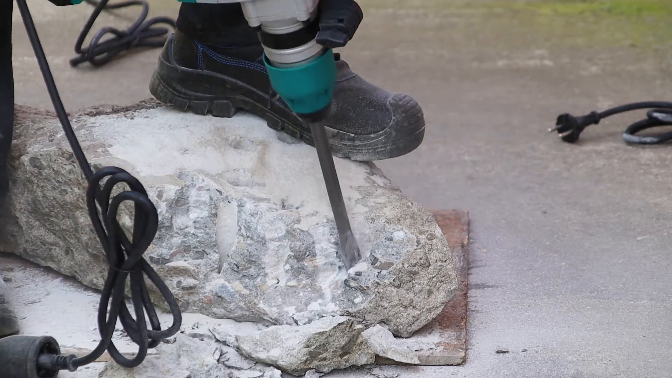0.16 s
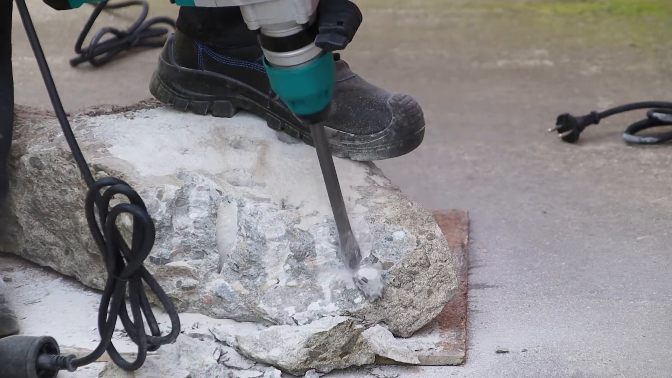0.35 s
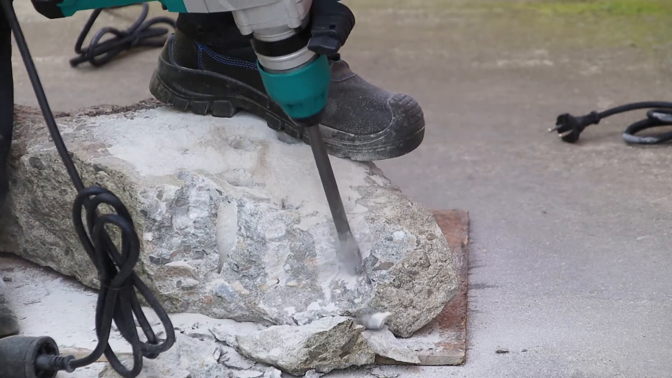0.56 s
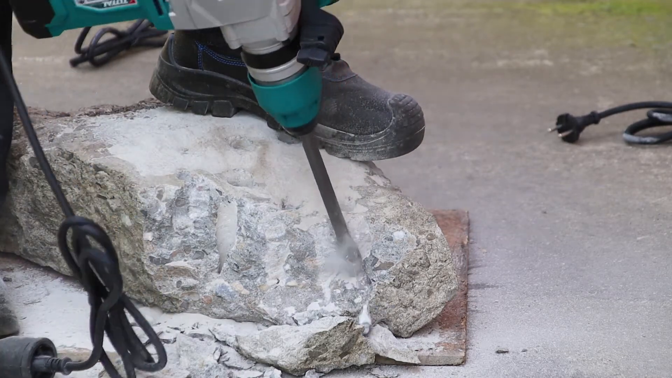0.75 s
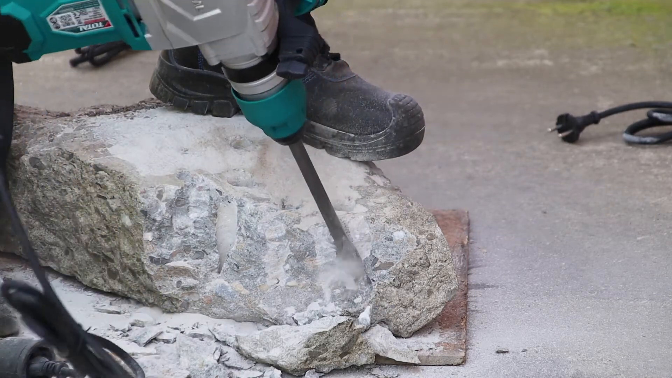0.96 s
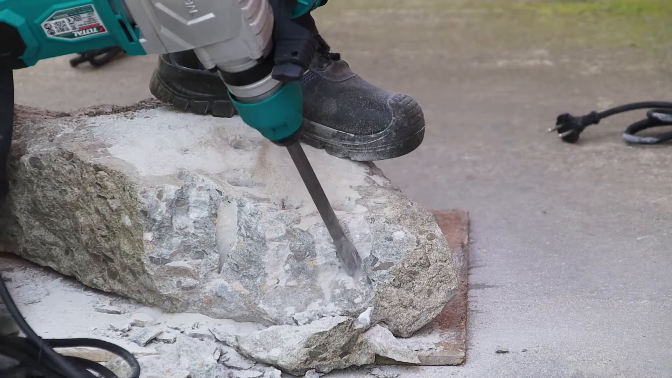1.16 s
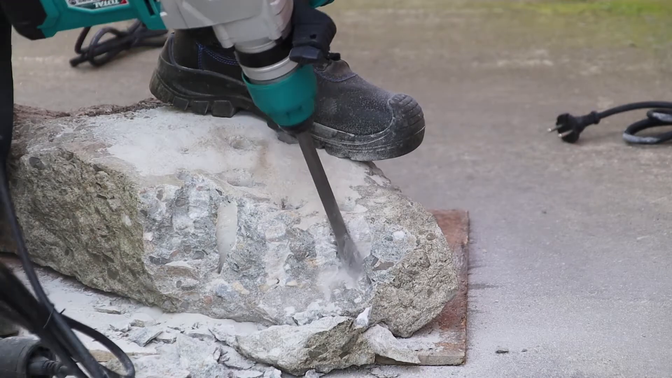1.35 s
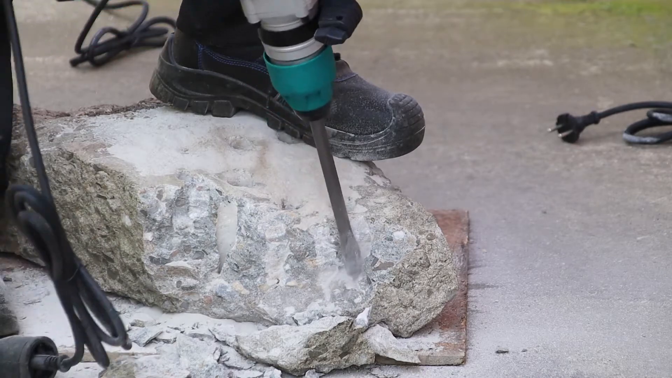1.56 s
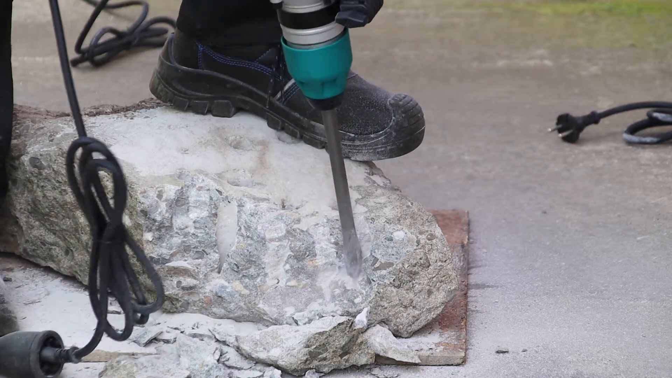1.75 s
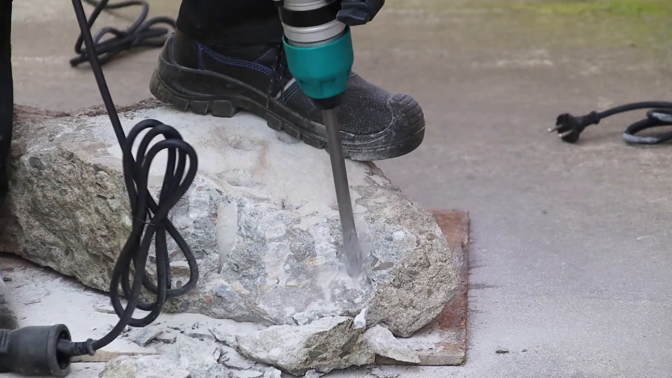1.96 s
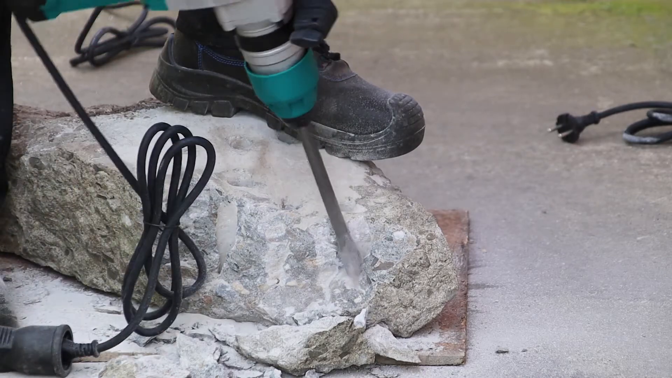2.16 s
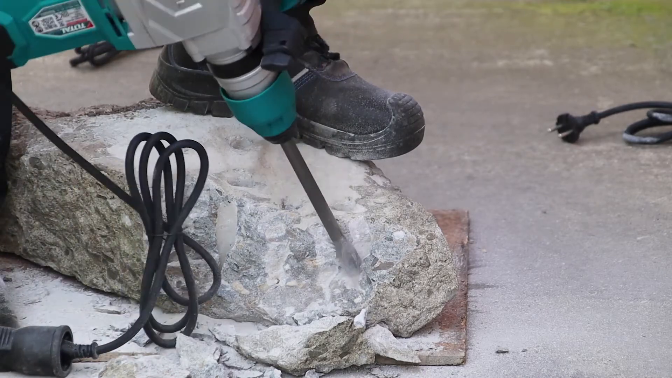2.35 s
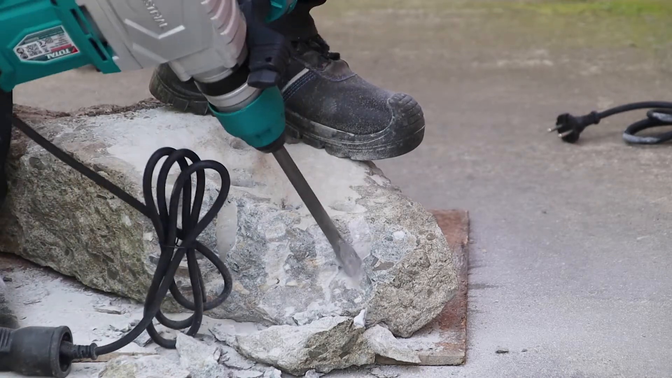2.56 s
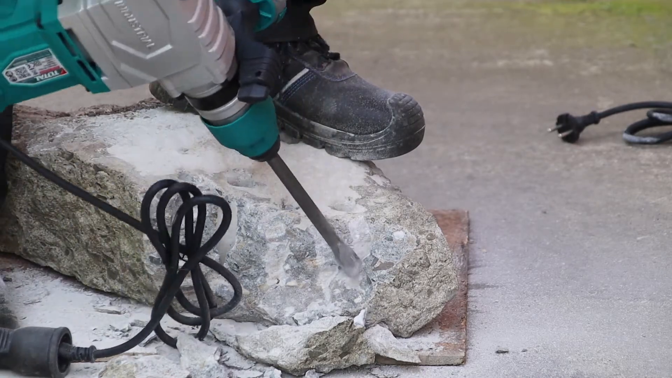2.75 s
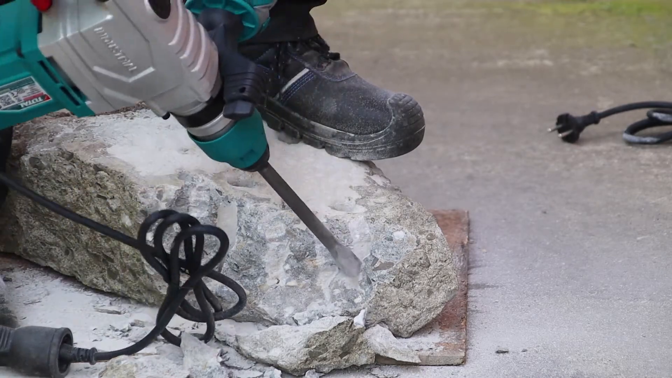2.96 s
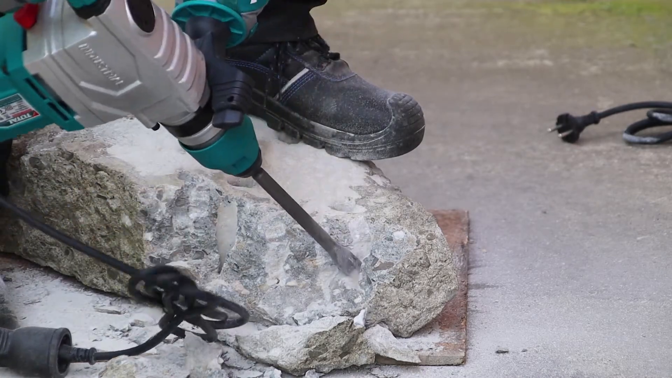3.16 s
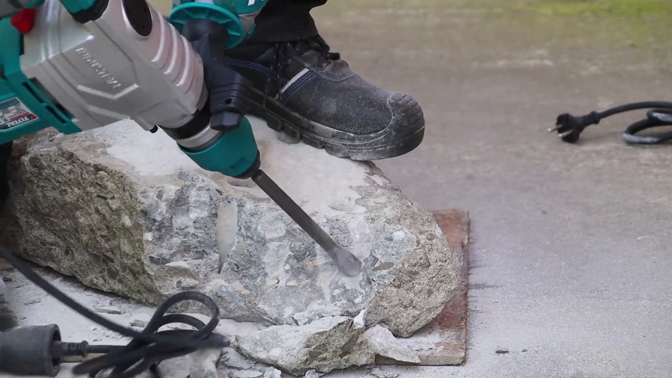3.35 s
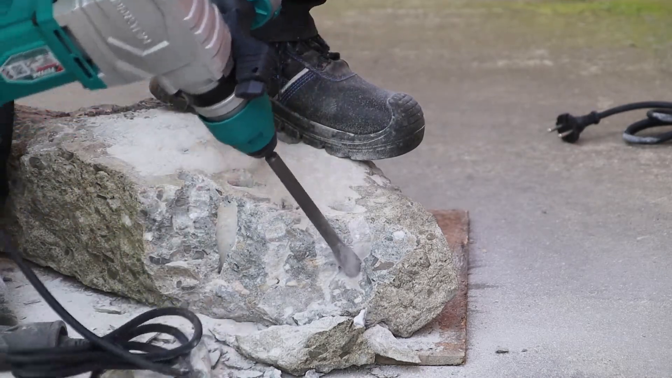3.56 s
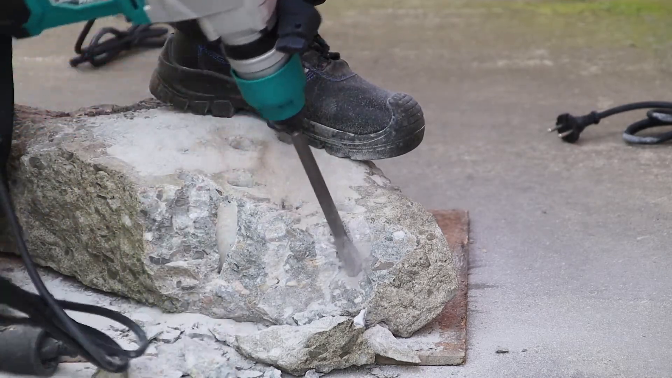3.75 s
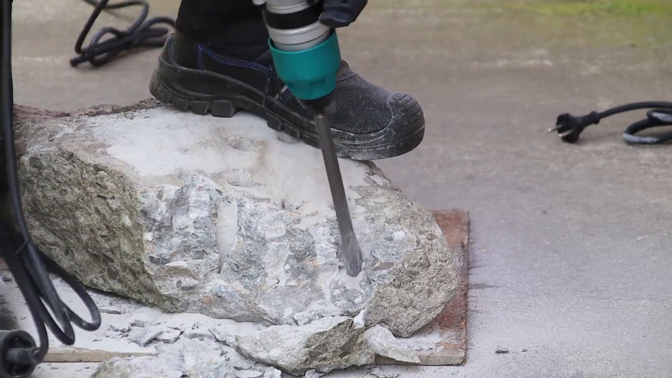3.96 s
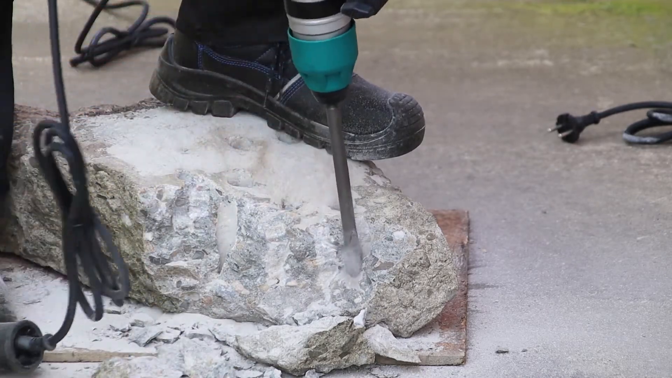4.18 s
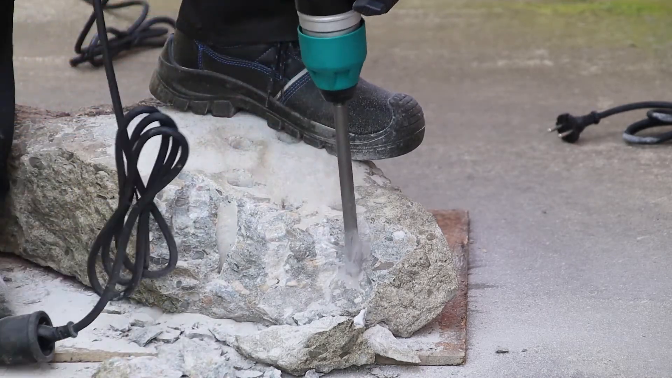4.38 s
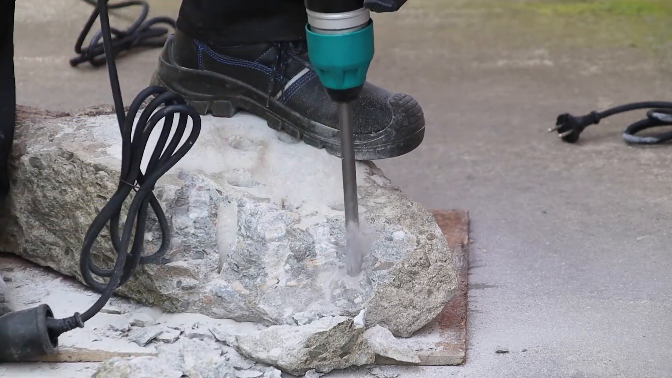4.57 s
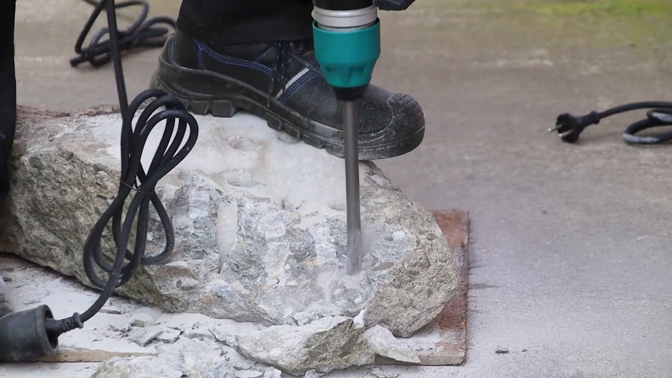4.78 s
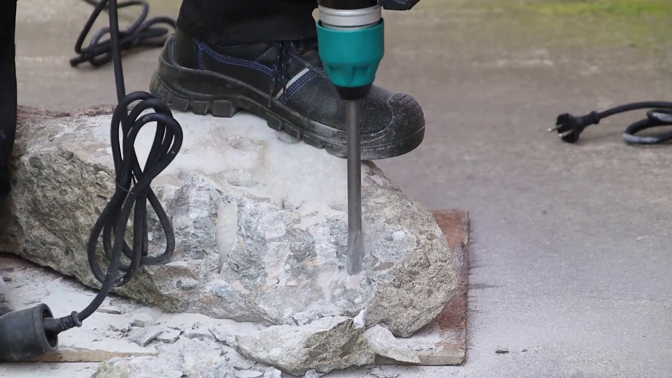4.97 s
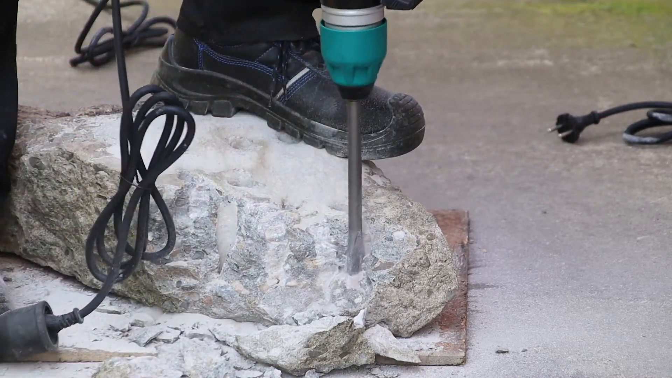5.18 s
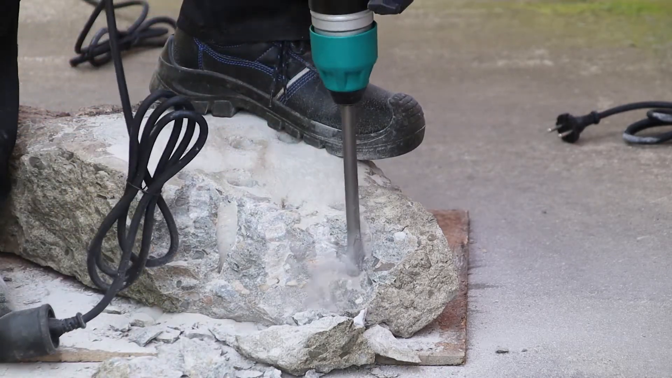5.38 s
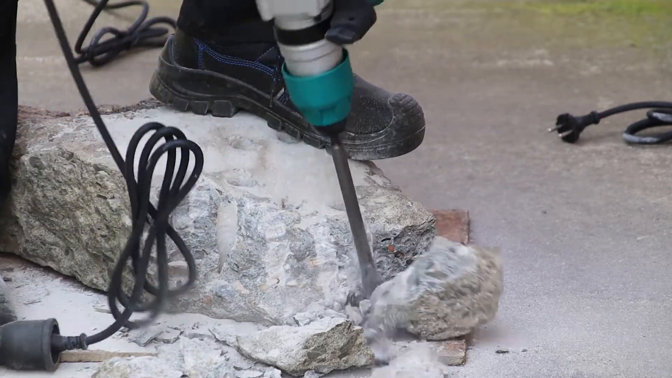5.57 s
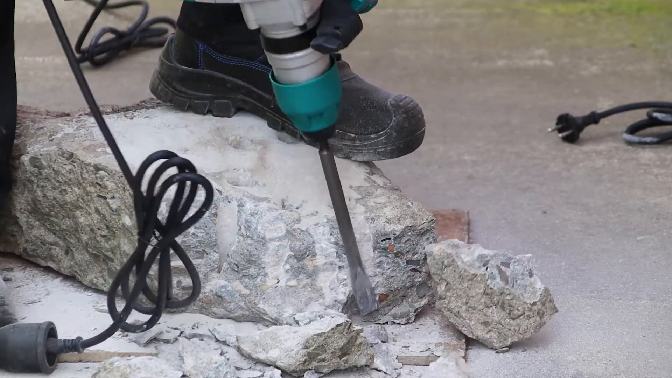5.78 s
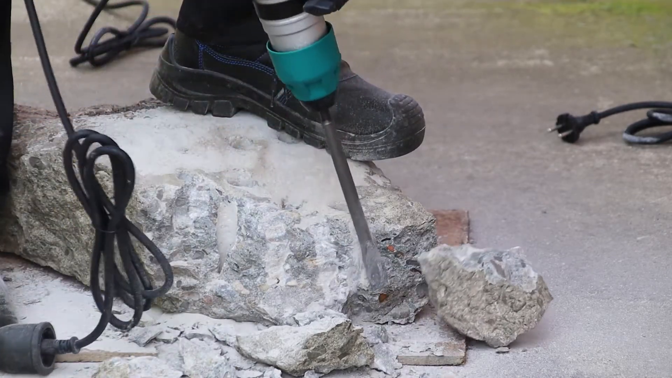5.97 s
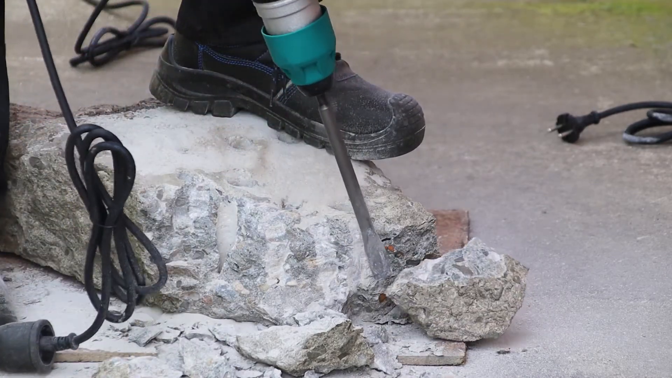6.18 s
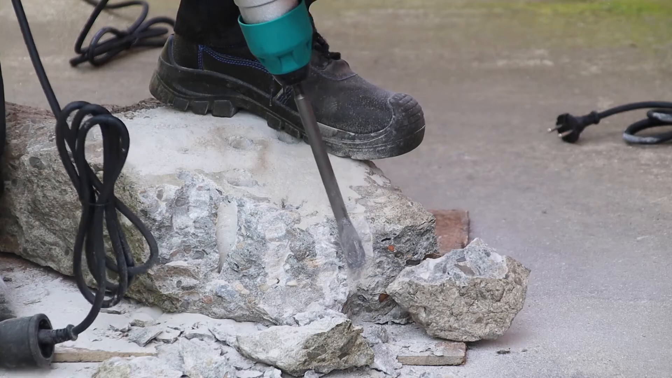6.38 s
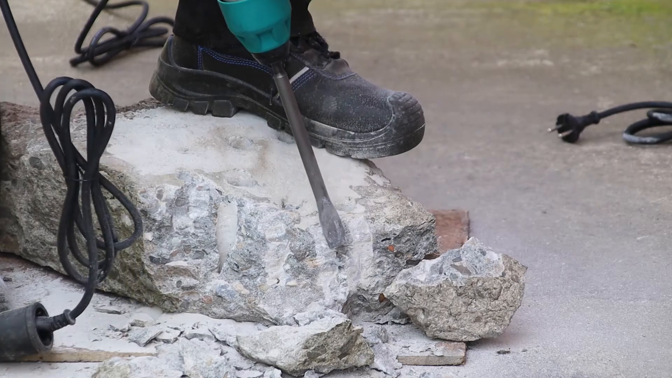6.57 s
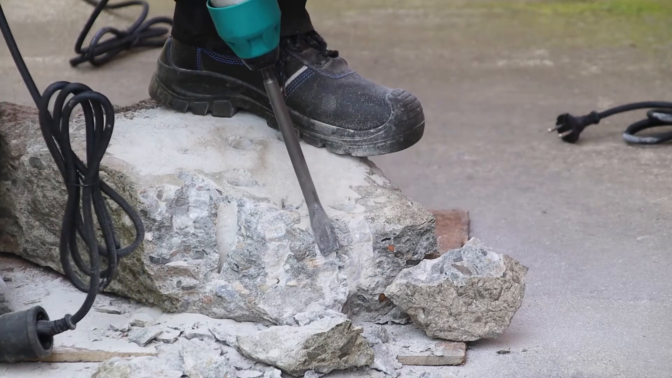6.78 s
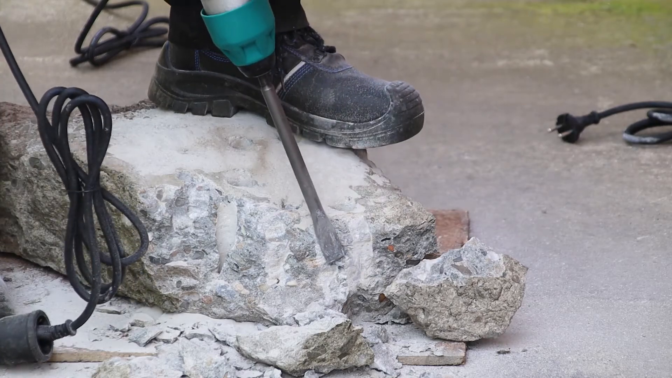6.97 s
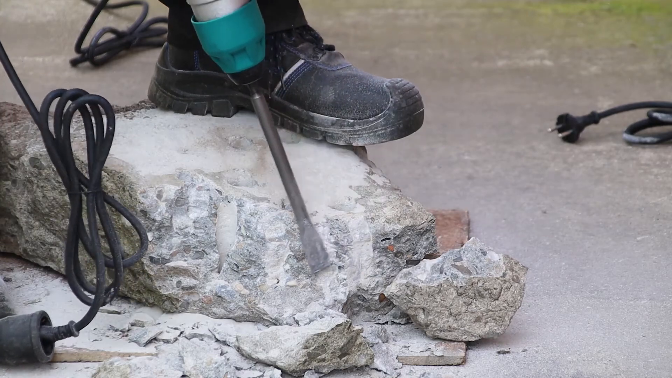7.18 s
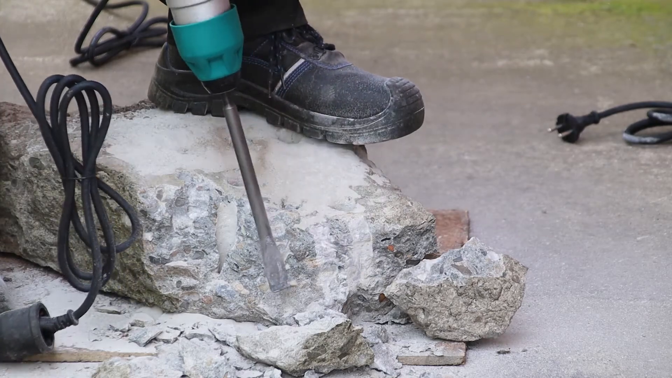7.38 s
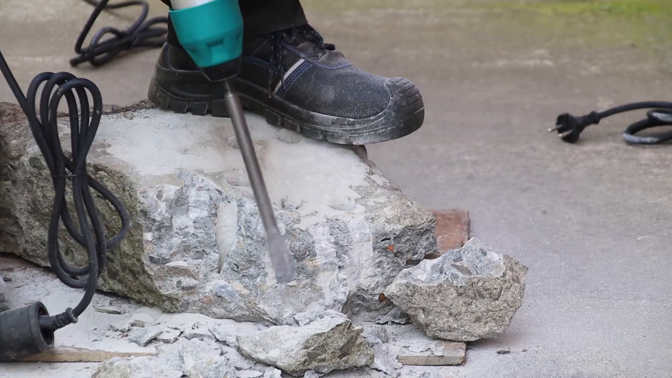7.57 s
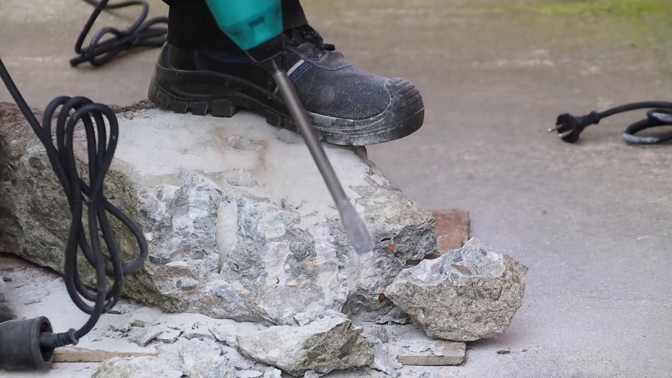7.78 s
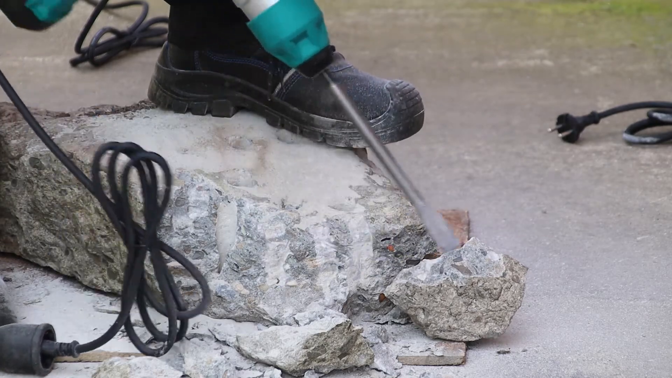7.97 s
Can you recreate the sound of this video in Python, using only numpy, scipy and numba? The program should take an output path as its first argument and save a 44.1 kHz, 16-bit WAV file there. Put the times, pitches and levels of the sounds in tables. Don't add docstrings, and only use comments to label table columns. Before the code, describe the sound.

Harsh, fast metallic hammering on a stone block outdoors, with motor whine; stone breaks, the motor ticks to a stop, a board scrapes faintly.

```python
import sys
import numpy as np
from scipy import signal
from scipy.fft import rfft, irfft, next_fast_len
from scipy.io import wavfile
from scipy.ndimage import uniform_filter1d
from numba import njit

SR = 44100
rng = np.random.default_rng(int(sys.argv[2]) if len(sys.argv) > 2 else 0)


def ratio_of_db(decibels):
    return 10 ** (np.asarray(decibels, float) / 20)


def unload_wav(signal):
    wavfile.write(
        sys.argv[1],
        SR,
        np.round(np.clip(np.atleast_2d(signal).T, -1, 1) * 32767).astype(np.int16),
    )


N = 354123
T, SIZE = np.arange(N) / SR, next_fast_len(N)
HZ = np.maximum(np.arange(SIZE // 2 + 1) * SR / SIZE, 1)


def curves(rows):
    s, *columns = np.transpose(rows)
    return [np.interp(T, s, c) for c in columns]


def over_hz(points):
    hz, value = np.transpose(points)
    return np.interp(np.log(HZ), np.log(np.maximum(hz, 1)), value)


def unit(x):
    return x / np.sqrt(np.mean(x ** 2))


def walk(rate):
    k = int(SR / rate)
    held = np.repeat(rng.standard_normal(N // k + 1), k)
    return 0.855 * uniform_filter1d(held, k)[:N]


def bump(s, length):
    out = np.zeros(N)
    span = slice(max(int((s - length / 2) * SR), 0), int((s + length / 2) * SR))
    out[span] = np.cos(np.pi * (T[span] - s) / length) ** 2
    return out


def step(s, length):
    return np.clip((T - s) / length + .5, 0, 1)


def peaks(table):
    return np.prod([1 + (ratio_of_db(db) - 1) / (1 + (2 * (HZ - hz) / width) ** 2)
                    for hz, width, db in table], axis=0)


def fade(x, t60, rise=0.00055):
    p, q = np.exp(-np.log(1000) / (t60 * SR)), np.exp(-1 / (rise * SR))
    return signal.lfilter([1 - q], [1, -q], signal.lfilter([1], [1, -p], x))


# (frequency [Hz], share [0-1])
LIKENESS = [(30, 0.3), (70, 0.8), (200, 0.9), (600, 0.84), (1500, 0.37), (4000, 0.3), (15000, 0.56)]
# (frequency [Hz], phase [rad])
PORT_LEAD = [(0, 0), (260, 0.1), (1890, -0.9), (2330, -0.6), (2580, 1.1), (2840, -0.2), (4130, 0.1),
             (5680, 1.2), (6120, 3.4), (6550, 2.2), (12100, 1.0), (13400, 0.9), (13700, 2.4), (16200, 3.0)]
# (frequency [Hz], left minus right [dB])
PORT_BALANCE = [(60, 0.0), (110, 1.5), (200, 1.5), (380, 2.0), (700, 1.0), (1290, 2.5), (2380, -3.0),
                (4400, -1.0), (8120, -2.2), (15000, -1.0)]


def ports(gate, gain, clean=0, near=1):
    same, other = rfft(gate * rng.standard_normal((2, N)), SIZE)
    alike = np.clip(over_hz(LIKENESS), 0, 1) * near
    same = same + rfft(clean + 0 * T, SIZE)
    right = alike * same * np.exp(-1j * over_hz(PORT_LEAD)) + np.sqrt(1 - alike ** 2) * other
    balance = ratio_of_db(over_hz(PORT_BALANCE) / 2)
    return irfft(np.array([same * balance, right / balance]) * gain, SIZE)[:, :N]


@njit
def resonate(x, hz, keep, sr):
    out, z, turn, last = np.empty(len(x), np.complex128), 0j, 0j, -1.
    for i in range(len(x)):
        if hz[i] != last:
            turn, last = np.exp(2j * np.pi * hz[i] / sr), hz[i]
        z = z * keep[i] * turn + x[i]
        out[i] = z
    return out


def mode(x, hz, t60, pan_db, lead, kept=1):
    keep = np.exp(-np.log(1000) / (t60 * SR)) * np.where(x != 0, np.clip(kept, 0, 1), 1.)
    z = resonate(x + 1e-18, hz + 0 * T, keep, 1. * SR)
    return np.array([z.imag * ratio_of_db(pan_db / 2), (z * np.exp(-1j * lead)).imag * ratio_of_db(-pan_db / 2)])


# (time [s], speed [turns/s])
WORK = [(0.0, 55.99), (1.685, 56.0), (2.017, 56.28), (2.301, 54.66), (2.416, 57.97), (2.582, 56.07),
        (3.042, 55.02), (3.403, 55.84), (3.612, 57.5), (3.781, 57.01), (3.95, 61.58), (4.155, 63.0),
        (4.325, 57.38), (4.516, 56.12), (4.996, 56.29), (5.547, 55.45), (5.764, 61.47), (5.848, 62.45)]
OFF_S, DRAG_PER_S, FRICTION_TURNS = 5.848, .8, 27
FIRST_TURN = .207


def crank():
    top = WORK[-1][1] + FRICTION_TURNS
    coast = np.maximum(top * np.exp(-DRAG_PER_S * (T - OFF_S)) - FRICTION_TURNS, .2)
    return np.where(T < OFF_S, curves(WORK)[0], coast)


def turns(speed, lag=0):
    return np.flatnonzero(np.diff(np.floor(np.cumsum(speed) / SR + FIRST_TURN - lag)) > 0)


def luck(at, count):
    return np.clip(rng.standard_normal((count, len(at))), -1.55, 1.55)


def train(at, lag_s, size):
    x = np.zeros(N + SR)
    x[at + (np.asarray(lag_s) * SR).astype(int)] = size
    return x[:N]


# (time [s], blow [dB], tip grip [-1 skating to 1 seated], chisel ring [dB])
PUSH = [(0, -45.5, 0.09, -45), (.3, -41, 0.92, -44), (.62, -42, 0.58, -44), (.75, -42, 0.53, -44.5),
        (1.25, -40.5, -0.44, -48.5), (1.6, -42.5, -0.53, -45), (1.78, -39, 1.1, -45),
        (2.05, -41.5, 1.1, -43.5), (2.3, -46.5, -1, -45), (2.77, -42, -0.1, -46), (3.25, -50, -1.3, -46.5),
        (3.8, -45.5, -0.32, -46.5), (3.87, -50.5, 1.5, -67), (4.1, -51, 1.6, -54.5),
        (4.15, -42.5, 0.37, -48.5), (4.22, -40.5, -0.26, -39.5), (4.5, -39, 0.21, -43.5),
        (5.11, -40, 0.94, -39), (5.53, -43.5, 1.2, -42)]
# (time [s], length [s], blow [dB], ring [dB], grip change)
SLIPS = [(0.602, 0.12, -2.5, -3, -1.2), (0.983, 0.13, 1, 2.5, 0.1), (1.41, 0.38, 1, 2, 0.53),
         (1.888, 0.26, -1.5, -1, -0.41), (2.38, 0.16, -6, -5.5, .1), (2.446, 0.067, 5, 2.5, 1.1),
         (2.496, 0.029, 4.5, -3, 0.51), (3.105, 0.097, 1.5, 0.5, -0.52), (3.464, .04, 6, -0.5, 1.4),
         (3.564, 0.15, -12, -3, -.5), (4.178, 0.091, 7.5, 2.5, 0.18), (4.662, 0.4, -3, 2, 0.25),
         (5.468, 0.091, -0.5, 2, 1.6), (5.52, 0.14, -3, -5, -2.1)]


def lean():
    blow_db, grip, ring_db = curves(PUSH)
    for s, length, db, more_db, seat in SLIPS:
        hump = bump(s, length)
        blow_db = blow_db + db * hump
        ring_db = ring_db + more_db * hump
        grip = grip + seat * hump
    return blow_db, grip, ring_db


def blow_gate(at):
    chance = luck(at, 5)
    striker = fade(train(at, 0, ratio_of_db(4.2 * chance[0])), 0.0033)
    tip_lag_s = 0.0016 + 0.00017 * np.abs(chance[1])
    tip = fade(train(at, tip_lag_s, 1.86 * ratio_of_db(1.6 * chance[2])), 0.0023)
    grit = fade(train(at, 0.00076, 0.21), 0.077)
    rebound = fade(train(at, 0.0182 + 0.0008 * chance[3], 0.18 * ratio_of_db(2.1 * chance[4])), 0.0032)
    return striker + tip + grit + rebound


# (frequency [Hz], level [dB per Hz])
CRACK = [(300, -25), (700, -14.5), (1200, -13), (2000, 0), (3000, -27), (4000, -8), (6000, 1.5), (9000, -3),
         (12000, -6.5), (16000, -2)]


def crack(gate, blow_db):
    colour = ratio_of_db(over_hz(CRACK)) / (1 + (1450 / HZ) ** 6)
    return unit(ports(gate, colour)) * ratio_of_db(blow_db + 1.5)


# (frequency [Hz], width [Hz], level [dB])
TIP = [(12200, 480, 30), (13450, 800, 28), (11470, 500, 22)]
SHADE_S, SHADE_LENGTH_S, SHADE_DB = 3.14, 2.2, -7


def tip_zing(at, gate, zing_db):
    long_gate = gate + fade(train(at, 0, 0.31), 0.019)
    zing = unit(ports(long_gate, peaks(TIP) - 1)) * ratio_of_db(zing_db - 2.0 + 2.0 * walk(5.6))
    landed = unit(ports(gate, peaks(TIP[1:2]) - 1)) * ratio_of_db(zing_db - 4.0) * bump(4.3, 0.68)
    return zing + landed


# (frequency [Hz], level [dB], t60 [s], left minus right [dB])
CHISEL = [(1760, -5, 0.014, -6), (1433, -12.5, 0.044, -8), (2420, -19, 0.08, -18), (2857, -3.5, 0.031, 2),
          (3803, -10, 0.059, 3), (7580, -8, 0.0086, -25.5), (2674, -27, 0.061, -3), (3544, -12, 0.14, -4.5)]
# (time [s], length [s], level [dB])
CHOKES = [(2.36, .06, -3.5), (2.405, .08, -4.5), (2.503, 0.071, -18), (2.562, .09, 3.5),
          (2.664, 0.044, -6.5), (2.783, 0.22, -4), (2.84, 0.054, -13), (2.913, 0.033, -18),
          (2.978, 0.09, -6), (3.076, 0.041, -15), (3.124, .05, -16), (3.19, 0.07, -7), (3.1, .04, 5),
          (3.258, 0.035, -10.5), (3.286, .06, 3), (3.335, .04, -7), (3.407, .05, 2), (3.386, 0.036, -6),
          (3.485, 0.043, -7), (3.57, .05, -3), (3.64, .06, 1.5), (3.7, 0.033, -8), (3.763, 0.1, -3)]
RING_HZ, RING_DRIFT = 1636, .0015
RING_KEPT, SLANT_KEPT, SLANT_HZ = 0.17, .03, 10
SLANT_RING_DB = 3
CRACKED_S, CRACKED_DB, GRIT_SCATTER = 5.39, -12, .25


def chisel_ring(at, ring_db):
    bite_db = ring_db + 46
    chance = luck(at, 3 + len(CHISEL))
    high_db = -1.5 - 0.16 * bite_db + 0.5 * walk(11)
    low_hz = RING_HZ * (1 + RING_DRIFT * walk(4.8))
    choke_db = sum(db * bump(*at_s) for *at_s, db in CHOKES)
    slant = bump(3.14, 1.6)
    low_push = train(at, 0.00239, (1 + 0.2 * chance[0]) * ratio_of_db(0.196 * choke_db[at]))
    low_hz = low_hz * (1 + 0.0006 * walk(26)) + SLANT_HZ * slant
    ring = mode(low_push, low_hz, 0.13 + .05 * slant, 3.8, -1.14, RING_KEPT + SLANT_KEPT * slant)
    slant_db = SLANT_RING_DB * bump(3.61, 0.88)
    ring = ring * ratio_of_db(choke_db + slant_db + CRACKED_DB * step(CRACKED_S, .04))
    high_push = train(at, 0.00128 + .00004 * chance[2], 1 + 0.16 * chance[1])
    high_hz = (2553 - 17 * step(4.6, 0.41)) * (1 + 0.0036 * walk(9))
    ring += ratio_of_db(high_db) * 1.7 * mode(high_push, high_hz, 0.064, -4.5, 1.31, 0.3)
    for k, (hz, db, t60, pan_db) in enumerate(CHISEL):
        push = train(at, 0.001313, 1 + GRIT_SCATTER * chance[3 + k])
        lesser_db = db + 4.5 + .5 * (ring_db + 31.5)
        ring += ratio_of_db(lesser_db) * mode(push, hz, t60, pan_db, 6.1 * np.sin(3.098 * k))
    return unit(ring) * ratio_of_db(ring_db + 4.5 - 9.2 * step(CRACKED_S + 0.053, 0.068))


CHUCK_TAIL, CHUCK_TAIL_S = .13, .06


def chuck(at, gate, ring_db):
    gate = gate + fade(train(at, 0, CHUCK_TAIL), CHUCK_TAIL_S)
    colour = 1 / (1 + ((HZ - 3750) / 380) ** 4)
    level_db = ring_db - 4.8 - 11.0 * step(CRACKED_S - .04, 0.13)
    level_db += 2.4 * bump(4.98, 0.88) - 4.8 * bump(4.32, 0.59)
    return unit(ports(gate, colour)) * ratio_of_db(level_db)


# (frequency [Hz], level [dB], t60 [s], share of piston puff [0-1])
STONE = [(111.7, 19.5, 0.04, 0.65), (168, 5, 0.0028, 0.99), (215.3, 10.5, 0.088, 0.84), (313, 0.5, 0.12, 1),
         (373.7, 13, 0.046, 0.18), (507, 3.5, 0.068, 1), (571, 3, 0.27, 0.048), (617, 11.5, 0.074, 0.09),
         (702.6, 16.5, 0.034, 0.12)]
# (slanted [dB], idling [dB], upright [dB])
STONE_TILT = [(1, -8, 1), (-3, 1.5, -6), (0.5, -11.5, -2.5), (0.5, 6, -6), (4, -9.5, -9), (-1.5, -4.5, 1.5),
              (2, -9, -5.5), (1, 1, -0.5), (1, 1, 1.5)]
LANDING_DB = [-14, -5, -5, 7, -3, 6, 7, 7, 0]


def stone_thump(at, thump_db):
    chance = luck(at, len(STONE))
    tilt = np.array([bump(3.1, 1.7), bump(4.0, 0.62), step(4.63, .6)])
    thump = 0
    for k, (hz, db, t60, puff) in enumerate(STONE):
        blow = train(at, 0.0012, (1 - puff) * (1 + hz / 3000 * chance[k]))
        push = blow - train(at, 0.00961, puff)
        push[at] += (hz > 450) * 1.1 * bump(3.62, .6)[at] * chance[k]
        level_db = db + np.dot(STONE_TILT[k], tilt) + LANDING_DB[k] * bump(4.23, 0.24)
        thump = thump + ratio_of_db(level_db) * mode(push, hz, t60, 2.5 - hz / 300, 0.24 + hz / 2500)
    return unit(thump) * ratio_of_db(thump_db - 1.1)


# (frequency [Hz], level [dB], t60 [s], change once wedged [dB])
SLAB = [(950, -4.5, 0.22, 10), (1188, 11, 0.11, -14.5), (1124, -1, 0.2, 7.5), (1233, 0, 0.17, 1.5),
        (1070, -6, 0.14, 5.5), (843, -5.5, 0.11, 4), (790, -10, 0.12, 3), (1354, -3.5, 0.14, 7)]


def slab_knock(at, gate, knock_db):
    chance = luck(at, len(SLAB))
    knock = 0
    for k, (hz, db, t60, wedged_db) in enumerate(SLAB):
        push = train(at, 0.0011, 1 + 0.26 * chance[k])
        knock = knock + ratio_of_db(db + wedged_db * bump(5.14, 0.91)) * mode(push, hz, t60, 0.8, -0.2)
    dull = unit(ports(gate, 1 / (1 + ((HZ - 1050) / 350) ** 4)))
    return (unit(knock) + 0.6 * dull) * ratio_of_db(knock_db - 12.0)


def hammer(speed):
    at = turns(speed)
    at = at[T[at] < PUSH[-1][0]]
    blow_db, grip, ring_db = lean()
    force_db, bite_db = blow_db + 43, ring_db + 46
    thump_db = -53.0 + 0.083 * force_db + 0.55 * bite_db
    zing_db = -47 + 0.66 * force_db - 6 * grip + SHADE_DB * bump(SHADE_S, SHADE_LENGTH_S)
    knock_db = -50.5 + 1.05 * force_db + 7 * grip - 10 * bump(3.0, 1.4)
    gate = blow_gate(at)
    steel = crack(gate, blow_db) + tip_zing(at, gate, zing_db)
    steel = steel + chisel_ring(at, ring_db) + chuck(at, gate, ring_db)
    return steel + stone_thump(at, thump_db) + slab_knock(at, gate, knock_db)


# (speed [turns/s], roar [dB], brush rattle [dB])
RUNDOWN = [(0.2, -27, -5), (1.78, -15, 3), (4.0, -13, 8.5), (10.4, -11.5, 4), (17.8, -9.5, 3),
           (30.7, -5, -3), (45.5, -2, -11), (60.7, 0.5, -3)]
# (speed [turns/s], level [dB])
WHINE = [(.2, -99), (2, -68), (5, -58), (10, -59), (16, -69), (26, -64), (34, -59), (42, -64), (63, -60)]
# (time [s], length [s], whine [dB])
COVERS = [(1.1, 1.6, -3), (2.77, 0.38, -24), (3.02, 0.2, 0), (3.27, 0.25, -6), (3.528, .06, -5),
          (3.74, .2, 0), (4.06, 0.2, 0), (3.867, .12, 1.5), (3.964, 0.065, -4), (6.0, 0.16, 4.5),
          (6.245, 0.083, -2), (6.33, .14, -1), (6.4, 0.05, -5), (6.19, .07, 3), (6.55, .07, 6),
          (7.1, .08, 2.5), (7.17, .05, -5), (6.93, .04, 3), (6.49, .05, -6), (6.63, .09, -10),
          (6.75, 0.069, -9), (6.79, 0.031, 6), (6.875, 0.11, -8), (6.956, .04, -8), (7.05, .04, -5),
          (7.112, .06, 2)]
LOUDER_S, LOUDER_DB, LOUDER_RISE_S = 4.17, 3.5, 0.1
AWAY_S, AWAY_DB, BACK_S = 5.4, -5, 5.74
ROAR_DB, RATTLE_DB, RATTLE_DB_PER_TURN = -42, -54.5, -1.23
SLANT_WHINE_DB, SLANT_RATTLE_DB = 3.5, -21


def motor_levels(speed):
    facing_db = LOUDER_DB * step(LOUDER_S, LOUDER_RISE_S)
    facing_db += AWAY_DB * step(AWAY_S, 0.28) + 2.67 * step(BACK_S, 0.11)
    extra_turns = np.where(T < OFF_S, speed, WORK[-1][1]) - 56
    rate, *down = np.transpose(RUNDOWN)
    roar_down, rattle_down = [np.interp(speed, rate, d) * (T > OFF_S) for d in down]
    roar_db = ROAR_DB + facing_db + roar_down
    whine_db = np.interp(speed, *np.transpose(WHINE))
    whine_db = whine_db + SLANT_WHINE_DB * bump(SHADE_S, SHADE_LENGTH_S)
    whine_db += sum(db * bump(*at_s) for *at_s, db in COVERS)
    rattle_db = RATTLE_DB + 0.51 * facing_db + RATTLE_DB_PER_TURN * extra_turns
    rattle_db += rattle_down + SLANT_RATTLE_DB * bump(3.16, 1.4)
    return roar_db, whine_db, rattle_db


# (frequency [Hz], level [dB per Hz])
ROAR = [(59, -64.5), (100, -25.5), (193, -23.5), (330, -18.5), (620, -9), (925, -9), (1500, -2), (1980, -5),
        (2900, -0.5), (7530, 0), (8920, -5), (15800, -13)]
# (frequency [Hz], width [Hz], level [dB])
HOUSING = [(1008, 186, 7), (1546, 260, 5), (2020, 260, 2.5), (2570, 340, 4.5), (3420, 530, 4),
           (4800, 870, 2)]
RACE_DB = 2.5


def fan_roar(speed, roar_db):
    flutter = ratio_of_db(1.12 * walk(500) + 1.35 * walk(40))
    colour = ratio_of_db(over_hz(ROAR))
    treble = 1 / (1 + (4500 / HZ) ** 4)
    racing = bump(4.05, 0.27)
    body = ports(flutter, colour * peaks(HOUSING) * (1 - treble))
    hiss = ports(flutter, colour * treble) * (speed / 60) ** 0.5 * ratio_of_db(RACE_DB * racing)
    return unit(body + hiss) * ratio_of_db(roar_db + 1.75 + 2.2 * racing)


# (frequency [Hz], width [Hz], level [dB])
CRAWL = [(973, 120, 8), (1540, 300, 1.5), (2140, 200, 5.5), (2620, 260, 9.5), (3140, 200, 3)]
CRAWL_TURNS = 14


def brush_rattle(speed, bar, rattle_db):
    sparks = ratio_of_db(2.0 * walk(900) + 0.95 * walk(30)) * (1 + .5 * np.cos(2 * np.pi * bar))
    slow = 1 / (1 + (speed / CRAWL_TURNS) ** 4)
    running = unit(ports(sparks, np.maximum(peaks(HOUSING) - 1, 0) ** 1.46))
    crawling = unit(ports(sparks, (peaks(CRAWL) - 1) ** 1.3))
    return (running * np.sqrt(1 - slow) + crawling * np.sqrt(slow)) * ratio_of_db(rattle_db)


# (frequency [Hz], width [Hz], level [dB])
VENTS = [(2040, 150, 11), (2480, 300, 14.5), (3150, 130, 9.5), (3700, 120, 5), (4380, 180, 4),
         (4880, 160, 11), (6300, 880, 17), (9000, 1140, 12)]
COILS, WOBBLE = 14, .28


def commutator_whine(bar_hz, bar, whine_db):
    patchy_db = np.where(T < OFF_S, 4., 3.5)
    whine = 0
    for k, db in enumerate([7, -1.5, -4, -10, -17], 1):
        level_db = db + patchy_db * np.minimum(0.23 * walk(30) + 1.1 * walk(70), .7)
        dulling = 1 + (k > 1) * (k * bar_hz / 5200) ** 5
        whine = whine + ratio_of_db(level_db) / dulling * np.sin(2 * np.pi * k * bar)
    whine *= 1 + WOBBLE * (1 + .6 * walk(12)) * np.cos(2 * np.pi * bar / COILS)
    return ports(0, peaks(VENTS) / (1 + (1900 / HZ) ** 16), whine) * ratio_of_db(whine_db)


BARS = 145.6
HUM_DB = -66


def motor(speed):
    roar_db, whine_db, rattle_db = motor_levels(speed)
    bar_hz = uniform_filter1d(speed, size=SR // 12) * BARS
    bar = np.cumsum(bar_hz * (1 + .0033 * walk(150))) / SR
    unloaded = np.clip((speed - 57) / 5, 0, 1)
    hum = ratio_of_db(HUM_DB + 3.0 * walk(15)) * unloaded * np.sin(2 * np.pi * bar / COILS)
    whine = commutator_whine(bar_hz, bar, whine_db)
    return fan_roar(speed, roar_db) + whine + brush_rattle(speed, bar, rattle_db) + hum


# (frequency [Hz], level [dB per Hz])
YARD = [(100, -9.5), (200, -2), (350, -11.5), (500, -4), (1000, -8.5), (1600, -11.5), (3000, -19.5),
        (6000, -22), (11000, -27), (15800, -24)]
# (time [s], level [dB])
WIND = [(0, -71), (.7, -76), (3.4, -79), (4.2, -71), (5.4, -83), (6.2, -100), (6.95, -93), (7.07, -77.5),
        (8.03, -74)]
YARD_DB = -69.5
BUMP_S, BUMP_DB, BUMP_LENGTH_S = .96, 3, .2


def yard():
    rumble = 1 / (1 + (HZ / 75) ** 4) / (1 + (45 / HZ) ** 3)
    wind_db = curves(WIND)[0] - 5.5 + BUMP_DB * bump(BUMP_S, BUMP_LENGTH_S)
    wind = unit(ports(1, rumble)) * ratio_of_db(wind_db)
    recover_db = np.interp(T, [6.0, 7.5, 8.03], [-6, 0, 3])
    hiss = unit(ports(ratio_of_db(0.58 * walk(2.8)), ratio_of_db(over_hz(YARD)), near=1 / (1 + HZ / 1500)))
    return hiss * ratio_of_db(YARD_DB + recover_db) + wind


# (time [s], peak level [dB], frequency [Hz])
KNOCKS = [
    (0.958, -32.5, 150),
    (0.978, -29.5, 186),
]


def cable():
    out = 0
    for s, peak_db, hz in KNOCKS:
        hit = fade(1. * (np.arange(N) == int(s * SR)), 0.0012, .0001)
        stand = [(hz, .06, .025), (330, .06, .012), (450, .04, .02), (750, .12, .007), (1020, .08, .012)]
        out = out + ratio_of_db(peak_db) * sum(gain * mode(hit, f, t60, 1.7, 1.0) for f, gain, t60 in stand)
    return signal.sosfilt(signal.butter(2, 65, "high", fs=SR, output="sos"), out)


# (time [s], peak level [dB], lows [dB], zing [dB], mids [dB])
TICKS = [(3.836, -28, -8, 0, -9), (4.129, -24.5, -7, -2, -4), (5.536, -21.5, -4, 5.5, -14),
         (5.554, -19.5, -9, 2, -5), (5.5738, -14, -11, -5, -2), (5.593, -22, -22, 3, -11),
         (5.598, -23.5, -17, 5, 0), (6.786, -48, 5, -22, -4), (7.398, -70, 8, -10, 4),
         (7.474, -66, -6, 0, -6), (7.845, -64, 4, -10, 2), (7.9074, -55, 3, -25, 3),
         (7.9774, -64, 17, -14, 13)]
# (time [s], peak level [dB], lows [dB])
SLAPS = [(6.245, -34, -13), (6.2704, -32, -15), (6.3274, -42, -13), (6.3562, -37, -17), (6.3884, -38, -5.5),
         (6.42, -33, -18), (6.454, -35, -12), (6.4901, -34.5, -13), (6.5286, -35, -12), (6.567, -37, -11),
         (6.61, -40, -7), (6.6566, -34, -15), (6.706, -42, -8), (6.7598, -39, -10), (6.9192, -46, -5),
         (7.0364, -50, -8)]
SLAP_DB = 8


def ticks():
    slaps = [(s, db + SLAP_DB, low + 3, -17, -8) for s, db, low in SLAPS]
    gates, out = np.zeros((4, N)), 0
    for s, peak_db, low_db, zing_db, mid_db in TICKS + slaps:
        gates[:, int(s * SR)] = ratio_of_db(peak_db + np.array([0, low_db, zing_db, mid_db]))
    bands = [(6500, 3800, .014), (1296, 900, .022), (12400, 1700, .016), (3300, 600, .018)]
    for gate, (hz, width, t60) in zip(gates, bands):
        colour = np.sqrt(SR / width / 8) / (1 + ((HZ - hz) / width) ** 4)
        out = out + ports(fade(gate, t60, .0008), colour) * 0.48
    return out


# (time [s], level [dB])
SCRAPE = [
    (7.55, -89),
    (7.766, -63),
    (7.814, -68),
    (7.856, -56),
    (7.874, -64),
    (7.918, -58),
    (7.96, -60.5),
    (7.996, -62),
    (8.03, -68),
]
# (frequency [Hz], level [dB])
SQUEAL = [(634, 8), (1268, -2), (1902, -2)]


def scrape():
    board_db = curves(SCRAPE)[0]
    squeal_db, grit_db = -78.5 + .35 * (board_db + 62), -81 + 4 * walk(22)
    on = np.clip((T - SCRAPE[0][0]) / 0.059, 0, 1)
    board = unit(mode(np.diff(rng.standard_normal(N + 1)), 170, 0.045, 2.7, .1))
    dull = signal.butter(2, 350, fs=SR, output="sos")
    board = unit(signal.sosfilt(dull, board)) * ratio_of_db(board_db)
    grit_colour = 1 / (1 + (HZ / 2500) ** 2) / (1 + (220 / HZ) ** 4) / np.sqrt(HZ)
    grit = unit(ports(ratio_of_db(2.0 * walk(60)), grit_colour))
    grit = grit * ratio_of_db(grit_db + 6.5 + 4.0 * step(7.75, .3))
    cycles = np.cumsum(1 + 0.0043 * walk(23)) / SR
    squeal = sum(ratio_of_db(db + 3.9 * walk(17)) * np.sin(2 * np.pi * hz * cycles) for hz, db in SQUEAL)
    squeal = squeal * ratio_of_db(squeal_db + 0.5) * np.clip((7.95 - T) / 0.12, 0, 1)
    return on * (board + grit + squeal)


def scene():
    speed = crank()
    near = hammer(speed) + motor(speed) * (speed > .2) + ticks()
    near = signal.sosfilt(signal.butter(6, 95, "high", fs=SR, output="sos"), near)
    dying = np.exp(-np.log(1000) * np.arange(6000) / (.15 * SR))
    tail = np.diff(rng.standard_normal((2, 6001))) * dying
    echo = ratio_of_db(-36.5) * signal.fftconvolve(near, tail, axes=1)[:, :N]
    return near + echo + cable() + scrape() + yard()


def roll_off(x):
    return signal.sosfilt(signal.butter(12, 16640, fs=SR, output="sos"), x)


def record(dry):
    low_pass = signal.ellip(10, .2, 80, 15830, fs=SR, output="sos")
    mix = signal.sosfilt(low_pass, dry)
    return roll_off(mix)


dry = scene()
out = record(dry)
unload_wav(out)
```